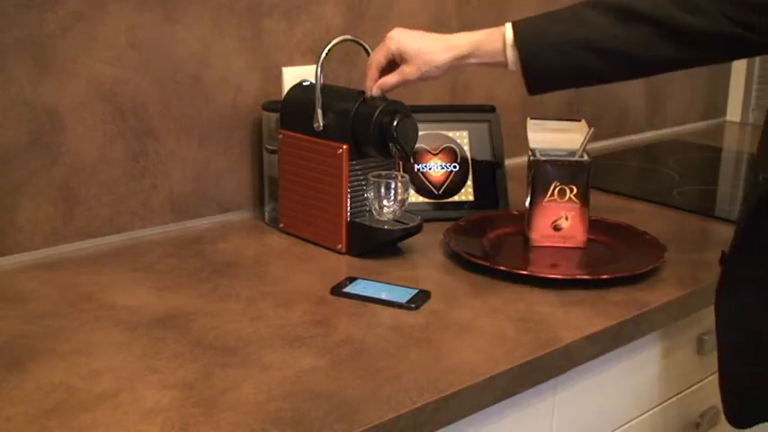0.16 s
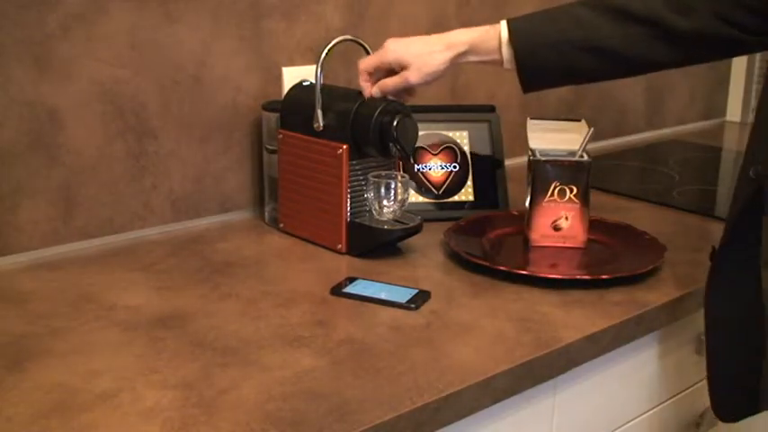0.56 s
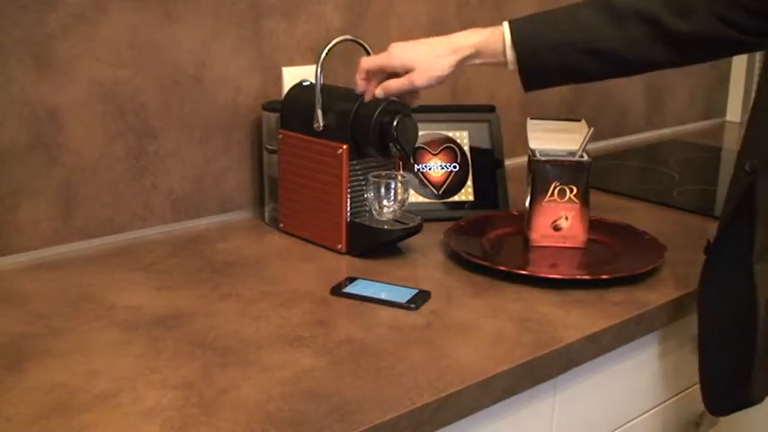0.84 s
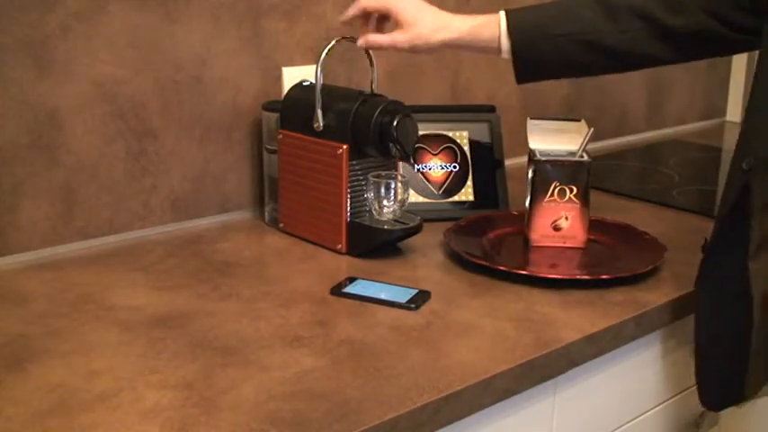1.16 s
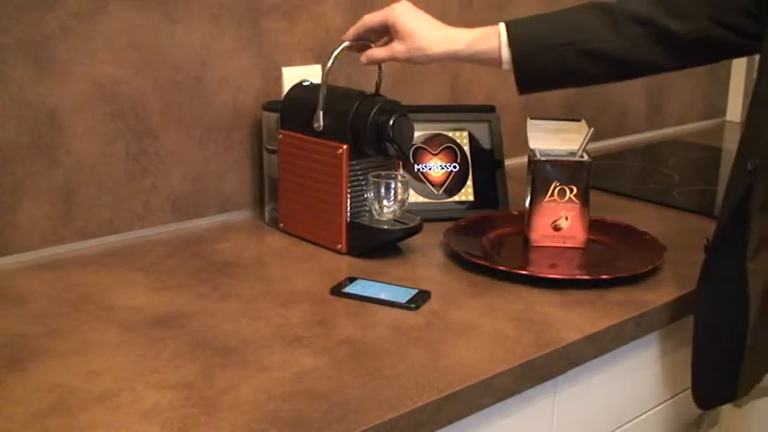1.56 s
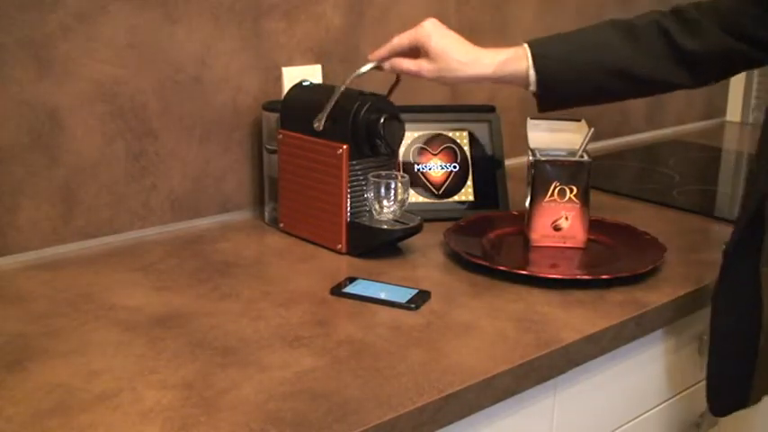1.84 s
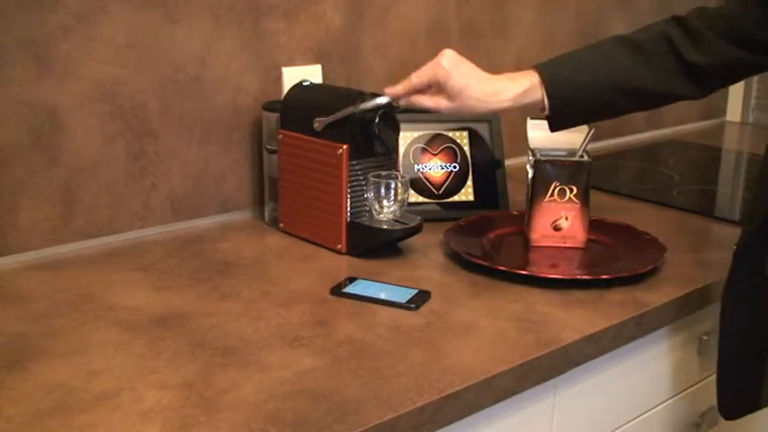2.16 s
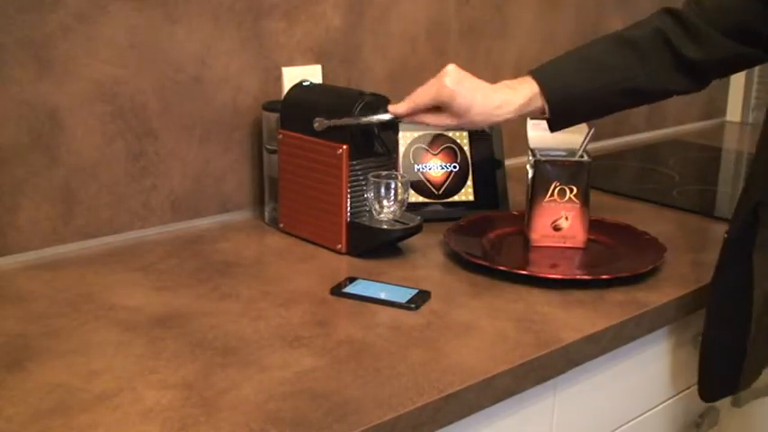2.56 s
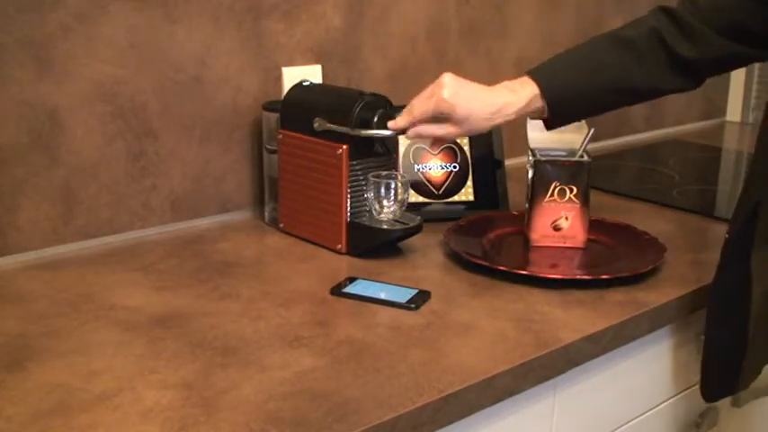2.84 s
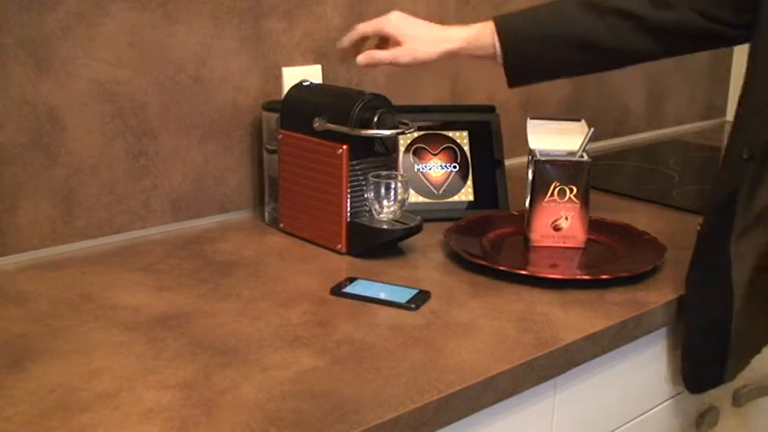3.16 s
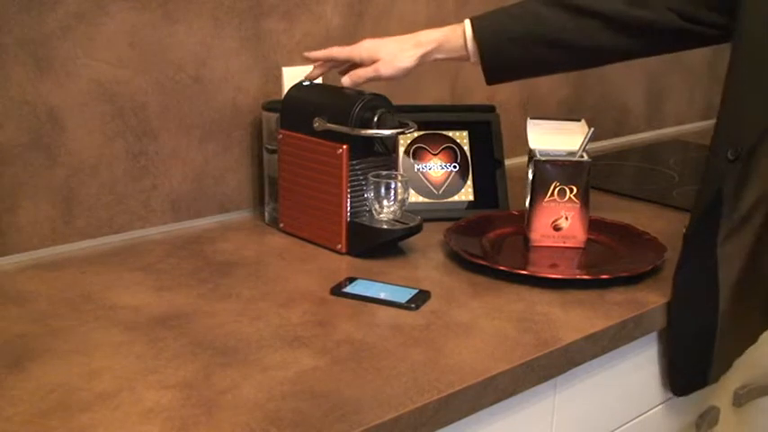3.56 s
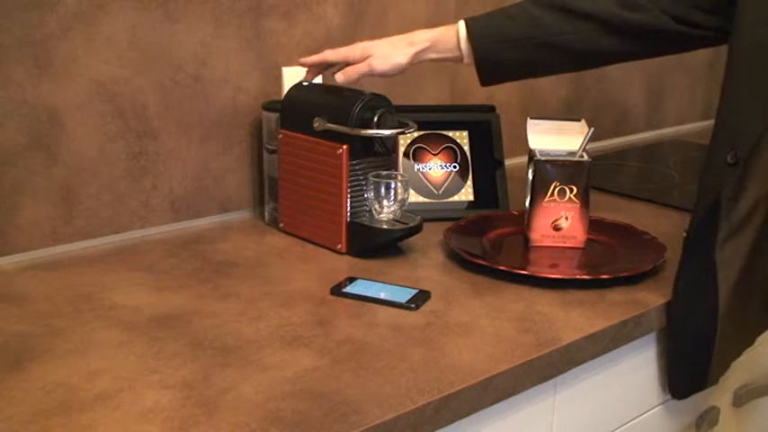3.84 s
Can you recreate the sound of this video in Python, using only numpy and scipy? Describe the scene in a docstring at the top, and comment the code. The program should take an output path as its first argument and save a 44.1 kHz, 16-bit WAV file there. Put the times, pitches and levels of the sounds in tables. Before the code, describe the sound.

Plastic clicks and clacks come from a coffee machine on a kitchen counter: a capsule slides in, the lever is pulled down and thuds shut, then a sleeve swishes softly and a button is pressed. The small room hums faintly.

```python
"""A low hum fills a small kitchen. A capsule is pushed into a coffee machine on the counter, rubbing
by stick-slip friction and catching in the slot. The lever is pulled down, rubbing and knocking; the
capsule drops into its chamber, is clamped, and the lever locks with a thud. A sleeve swishes, then a
finger works a button. Throughout, impacts crack in the plastic and excite the damped modes of
housing, chamber and counter, and the room reverberates."""
import sys
import numpy as np
from scipy import signal
from scipy.fft import rfft, irfft
from scipy.io import wavfile

SR = 44100
rng = np.random.default_rng(int(sys.argv[2]) if len(sys.argv) > 2 else 0)


def wav_out(sig):
    """Save sig, one row per channel (or a flat mono array), as 16-bit PCM at SR to the path in sys.argv[1]."""
    wavfile.write(sys.argv[1], SR, np.round(np.clip(np.atleast_2d(sig).T, -1, 1) * 32767).astype(np.int16))


N = 176400

# modes of the capsule chamber: frequency_hz, relative_db, t60_s
CHAMBER_MODES = [(1008, -7, 0.045), (1222, 0, 0.054), (1290, 0.5, 0.09), (1372, -5.5, 0.13),
                 (1520, -19, 0.12), (1760, -11.5, 0.037)]
# stereo width of the room, side relative to mid: frequency_hz, gain_db
ROOM_WIDTH = [(50, -16.5), (125, -24), (300, -5.5), (1200, -5.5), (2500, -6), (4500, -7.5), (8500, -7.5),
              (11000, -7), (12500, -38)]


def undb(db):
    """Amplitude ratio of a level in decibels."""
    return 10 ** (np.asarray(db) / 20)


def on_log(hz, points):
    """Interpolation of (frequency_hz, value) points on a logarithmic frequency axis."""
    frequencies, values = np.array(points, float).T
    return np.interp(np.log(np.maximum(hz, 1)), np.log(frequencies), values)


def colour(x, spectrum, tilt_db=0):
    """Filtering by a spectral envelope, tilted by tilt_db per octave above 1500 Hz."""
    hz = np.maximum(np.fft.rfftfreq(x.shape[-1], 1 / SR), 1)
    gain_db = on_log(hz, spectrum) + tilt_db * np.log2(np.maximum(hz, 1500))
    return irfft(rfft(x) * undb(gain_db), x.shape[-1])


def unit(x):
    """Normalisation to rms 1."""
    return x / np.sqrt(np.mean(x ** 2))


def burst(x):
    """Normalisation to the energy of 10 ms at rms 1."""
    return x * np.sqrt(SR / 100 / np.sum(x ** 2))


def fade(t, t60):
    """Exponential decay, falling 60 dB in t60 seconds."""
    return np.exp(-np.log(1000) * t / t60)


def add(track, start_s, x):
    """Superposition of a sound on a track."""
    i = int(start_s * SR)
    track[i:i + len(x)] += x[:max(N - i, 0)]


def stereo(mid, side):
    """Left and right as the sum and difference of mid and side."""
    return np.array([mid + side, mid - side])


def ring(modes, rise_s=0.0025, scatter_db=0.5):
    """Free vibration: a sum of damped modes, each blow exciting them a little differently."""
    t = np.arange(SR // 2) / SR
    vibration = 0
    for hz, db, t60 in modes:
        amplitude = undb(db + scatter_db * rng.standard_normal())
        vibration += amplitude * fade(t, t60) * np.sin(2 * np.pi * (hz * t + rng.random()))
    return burst(vibration * (1 - np.exp(-t / rise_s)))


def room_tone(hum_hz=49.3):
    """Ambient sound: steady broadband air noise and a pure low hum whose level wavers."""
    # spectrum of the air noise: frequency_hz, relative_db
    air_spectrum = [(25, -6), (45, -12), (75, -6), (110, -1.5), (150, -13.5), (178, 2.5), (220, -7.5),
                    (350, -13.5), (900, -12.5), (1300, -17.5), (2000, -21), (4000, -27.5), (8000, -33.5),
                    (13000, -36), (16000, -34)]
    # envelope of the hum: time_s, level_db
    hum_levels = [(0, -63.5), (.75, -60.5), (.92, -55), (1.12, -55), (1.25, -60), (2.65, -61.5), (2.8, -54),
                  (3.1, -59), (4, -64)]
    t = np.arange(N) / SR
    mid, side = colour(rng.standard_normal((2, N)), air_spectrum)
    air = stereo(mid, undb(4.5) * colour(side, ROOM_WIDTH)) / np.std(mid)
    hum_rms = undb(np.interp(t, *np.array(hum_levels).T))
    return undb(-60) * air + hum_rms * np.sqrt(2) * np.sin(2 * np.pi * hum_hz * t)


def rubbing(slips_per_s=1300, spread_db=1, smear_s=0.0027):
    """Stick-slip friction: random slips of plastic make a groan in the housing and a dry scratch."""
    # envelopes of the sliding capsule: time_s, groan_db, scratch_db
    capsule_slide = [(.13, -86, -87), (.18, -62, -58.5), (.26, -66, -81), (.36, -64, -73), (.42, -76, -73),
                     (.70, -81, -78), (.77, -70, -68), (.84, -63.5, -71), (.89, -74, -79),
                     (.96, -69, -64.5), (1.01, -64, -64), (1.05, -84, -87)]
    # envelopes of the moving lever: time_s, groan_db, scratch_db
    lever_slide = [(1.28, -75, -82), (1.37, -59, -63.5), (1.50, -57, -62), (1.62, -74, -69),
                   (1.70, -59, -59.5), (1.80, -58.5, -64.5), (1.90, -51.5, -58), (2.00, -54.5, -61),
                   (2.08, -66, -74), (2.22, -50, -85), (2.36, -70, -91), (2.48, -71, -92),
                   (2.60, -59.5, -72), (2.71, -55.5, -82), (2.80, -51, -70), (2.95, -66.5, -76),
                   (3.05, -78, -99.5)]
    # spectrum of the groan: frequency_hz, relative_db
    groan_spectrum = [(40, -17), (110, -2), (230, 7), (450, 2), (720, 3), (1000, -2), (1300, -22),
                      (1700, -12), (4000, -41), (16000, -61)]
    # spectrum of the scratch: frequency_hz, relative_db
    scratch_spectrum = [(300, -19), (1200, 0), (2500, -3), (4000, -8.5), (7000, -9), (10000, -15.5),
                        (16000, -22)]
    t = np.arange(N) / SR
    groan, scratch = np.zeros((2, N))
    for slide in (capsule_slide, lever_slide):
        times, groan_db, scratch_db = np.array(slide).T
        moving = (t > times[0]) & (t < times[-1])
        slips = (rng.random(N) < slips_per_s / SR) * rng.standard_normal(N)
        slips *= undb(spread_db * np.minimum(rng.exponential(size=N), 4))
        # each slip's energy is smeared into a short grain of noise
        energy = signal.lfilter([1], [1, -np.exp(-1 / (smear_s * SR))], slips ** 2)
        grit = np.sqrt(energy) * rng.standard_normal(N)
        groan += moving * unit(colour(slips, groan_spectrum)) * undb(np.interp(t, times, groan_db))
        scratch += moving * unit(colour(grit, scratch_spectrum)) * undb(np.interp(t, times, scratch_db))
    return groan, scratch


def carriage_judder():
    """Stick-slip excitation: the capsule carriage sticks, jumps in its guides and rings."""
    # jumps of the carriage: start_s, level_db
    jumps = [(.175, -52), (.232, -41), (.243, -52), (1.886, -43), (1.897, -53), (1.913, -47.5),
             (1.9655, -49.5), (1.980, -47.5), (1.990, -49), (2.749, -46)]
    # modes of the carriage: frequency_hz, relative_db, t60_s
    carriage_modes = [(352, -5, 0.09), (593, -3, 0.22), (653, 2, 0.089), (733, 1.5, 0.053),
                      (784, 0.5, 0.13), (825, -9, .07), (1290, -2, 0.034)]
    track = np.zeros(N)
    for start_s, db in jumps:
        add(track, start_s, undb(db) * ring(carriage_modes))
    return track


def crack(spectrum, tilt_db, decay_ms):
    """Impact transient: a sharp contact, then plastic case modes so dense that they decay as noise."""
    t = np.arange(SR // 4) / SR
    contact = burst(np.exp(-t * 1000 / decay_ms))
    case = undb(3) * burst(fade(t, t60=0.13))
    envelope = np.hypot(contact, case)  # the two add in power
    return burst(envelope * colour(rng.standard_normal(len(t)), spectrum, tilt_db))


def rim_catches():
    """Impulsive excitation: the capsule's rim catches on its way in, rasping and ringing the chamber."""
    # catches of the rim: start_s, chamber_db, rasp_db
    catches = [(0.2015, -43.5, -51), (0.2041, -55, -59), (0.2107, -39, -50), (.225, -62, -54)]
    # spectrum of the rasp: frequency_hz, relative_db
    rasp_spectrum = [(2000, -13), (5000, -18), (7500, -8), (9200, 0), (10300, -7), (11500, -17),
                     (14000, -12), (16000, -18)]
    ringing, rasps = np.zeros((2, N))
    for start_s, chamber_db, rasp_db in catches:
        add(ringing, start_s, undb(chamber_db) * ring(CHAMBER_MODES))
        add(rasps, start_s, undb(rasp_db) * crack(rasp_spectrum, tilt_db=0, decay_ms=2.2))
    return ringing, rasps


def knocks():
    """Modal response to impact: each blow cracks in the plastic and rings counter, housing, chamber."""
    # the capsule seats (0.23 s), drops (1.43 s) and is clamped (2.14 s); the lever locks (2.73 s);
    # a finger meets the button (3.86 s):
    # start_s, counter_db, housing_db, chamber_db, crack_db, tilt_db_per_octave, decay_ms
    blows = [ (.232, -53, -46, -48.5, -46.5, 4, 3.3), (.243, -48, -55, -65, -49, -18, 3.7),
             (0.4426, -70, -72, -50, -38, 6, 2.5), (.447, -78, -59, -55, -41, 7.5, 2.3),
             (0.731, -81, -80, -74, -60.5, 12.5, 2), (0.754, -78, -73, -68, -57.5, -10, 2.7),
             (1.369, -72, -52.5, -56, -44, 1, 2.8), (1.429, -73, -49, -48, -33.5, 2, 2.1),
             (1.436, -75, -57, -69, -45, 5, 2), (1.447, -79, -41, -45, -35, -3, 2.8),
             (1.452, -77, -43, -45, -38, -21, 1.4), (1.456, -60, -67, -70, -37.5, 3.5, 4.5),
             (1.73, -48, -51.5, -49.5, -46, 5, 4.9), (1.881, -60, -45, -51.5, -55, -2, 2),
             (1.934, -49.5, -47.5, -57, -80, -4, 3), (1.964, -62, -65, -67, -49, -11.5, 2.4),
             (2.1431, -44.5, -43.5, -46, -39, 1.5, 1.8), (2.211, -53, -56.5, -60, -65, -2, 3),
             (2.247, -72, -63, -74, -61, -7, 3), (2.610, -51.5, -65, -75, -60, 5, 2.5),
             (2.719, -63, -53, -68, -59, -1, 5.5), (2.7281, -38, -39.5, -55, -40.5, -9, 8.2),
             (2.733, -32.5, -38.5, -56, -38.5, -2.5, 1.7), (2.742, -37, -35, -54, -51, -18, 5),
             (2.760, -36.5, -42, -48, -48, -2, 4), (3.857, -81, -67, -58, -46, -6, 7.5),
             (3.977, -62, -68, -59, -50, -8, 6.3), (3.986, -44, -42.5, -46, -48, 1, 6),
             (3.994, -38.5, -41, -47.5, -43.5, -17, 5)]
    # modes of the counter: frequency_hz, relative_db, t60_s
    counter_modes = [(73, -13, 0.84), (109.5, -0.5, 0.33), (149, -1.5, 0.22), (174.2, -9, 1),
                     (231.3, -9.5, 0.49), (274, -1.5, 0.25), (359.8, 1, 0.19), (467, -2.5, 0.083),
                     (550, -7, 0.13), (624, -6, 0.18)]
    # modes of the housing: frequency_hz, relative_db, t60_s
    housing_modes = [(280, -4.5, .2), (360, -4.5, 0.095), (462, -7, 0.084), (541.3, -5, 0.2),
                     (590, -2.5, 0.13), (643, -1.5, 0.067), (729, 6.5, 0.046), (814, -2, 0.09),
                     (872, 0, .1), (975, 0.5, 0.092), (1121, -3.5, 0.13), (1200, -3.5, 0.065)]
    # spectrum of a crack before its tilt: frequency_hz, relative_db
    crack_spectrum = [(150, -25), (700, -2), (1500, -3.5), (2300, 1.5), (3200, 1), (4200, 0.5), (5500, 2.5),
                      (8000, -3), (10500, -7.5), (13000, -10.5), (14500, -22.5), (16000, -10)]
    ringing, cracks = np.zeros((2, N))
    for start_s, counter_db, housing_db, chamber_db, crack_db, tilt_db, decay_ms in blows:
        add(ringing, start_s, undb(counter_db) * ring(counter_modes, rise_s=0.0032))
        add(ringing, start_s, undb(housing_db) * ring(housing_modes))
        add(ringing, start_s, undb(chamber_db) * ring(CHAMBER_MODES))
        add(cracks, start_s, undb(crack_db) * crack(crack_spectrum, tilt_db, decay_ms))
    return ringing, cracks


def lever_ring():
    """Structure-borne sound: knocks reach the steel lever and excite its high, lightly damped modes."""
    # knocks at the lever: start_s, level_db
    strikes = [(.234, -52), (.443, -61), (1.997, -67), (2.733, -49)]
    # modes of the lever: frequency_hz, relative_db, t60_s
    lever_modes = [(3210, -17, .25), (5540, -11, 0.2), (6233, 2, 0.27), (6400, 6, 0.18), (7500, -11, 0.38),
                   (10450, -3.5, 0.18)]
    track = np.zeros(N)
    for start_s, db in strikes:
        add(track, start_s, undb(db) * ring(lever_modes))
    return track


def sleeve(peak_s=3.23, half_width_s=0.15):
    """Friction noise of cloth: a jacket sleeve swishes as the arm reaches over the machine."""
    # spectrum of the swish: frequency_hz, relative_db
    cloth_spectrum = [(800, -11), (2500, -7), (6000, -8.5), (9000, -10), (12500, -15), (16000, -16)]
    swell = np.exp(-((np.arange(N) / SR - peak_s) / half_width_s) ** 2)
    return undb(-67.5) * swell * unit(colour(rng.standard_normal(N), cloth_spectrum))


def button_ticks():
    """Heavily damped vibration: the button's cap ticks under the finger."""
    # ticks of the cap: start_s, level_db
    ticks = [(3.856, -51.5), (3.984, -47.5)]
    # modes of the cap: frequency_hz, relative_db, t60_s
    cap_modes = [(1280, -14, 0.041), (1955, 5, .04), (2155, -1, .05), (2240, -2, 0.046), (2444, 3, 0.059),
                 (2940, 1, 0.032)]
    track = np.zeros(N)
    for start_s, db in ticks:
        add(track, start_s, undb(db) * ring(cap_modes))
    return track


def kitchen(x, delay_s=0.0076):
    """Reverberation: a diffuse field decays at its own rate in each octave, the lows lasting longest."""
    # reverberation times: frequency_hz, t60_s
    decay_times = [(100, 1), (300, 0.17), (1000, 0.29), (3000, 0.45), (7000, 0.36), (15000, 0.23)]
    t = np.arange(SR) / SR
    hz = np.fft.rfftfreq(SR, 1 / SR)
    noise, tail = rfft(rng.standard_normal((2, SR))), 0
    octave = np.round(np.log2(np.clip(hz, 64, 16384)))
    for k in np.unique(octave):
        t60 = on_log(2 ** k, decay_times)
        envelope = fade(t, t60) * np.sqrt(2 * np.log(1000) / (t60 * SR))  # unit energy
        tail += irfft(noise * (octave == k)) * envelope
    tail *= np.clip(t / delay_s - .5, 0, 1)  # reflections build up around the delay
    mid = signal.fftconvolve(x, tail[0])[:N]
    side = signal.fftconvolve(x, colour(tail[1], ROOM_WIDTH))[:N]
    return stereo(mid, side)


def scene():
    """Superposition of the direct sound, its reverberation and the room tone."""
    groan, scratch = rubbing()
    rim_ringing, rasps = rim_catches()
    knock_ringing, cracks = knocks()
    body = groan + carriage_judder() + rim_ringing + knock_ringing
    bright = scratch + rasps + cracks + lever_ring() + sleeve() + button_ticks()
    return body + bright + kitchen(undb(-8) * body + undb(-6.5) * bright) + room_tone()


def record(dry):
    """Low-pass filtering: a steep elliptic filter removes the treble above 15.9 kHz."""
    return signal.sosfilt(signal.ellip(10, .2, 80, 15900, fs=SR, output="sos"), dry)


dry = scene()
out = record(dry)
wav_out(out)
```